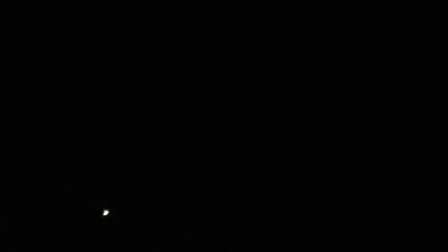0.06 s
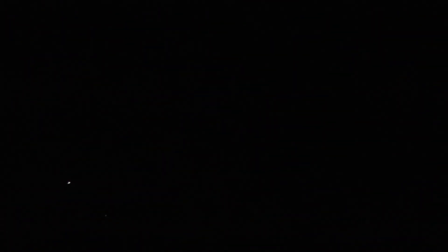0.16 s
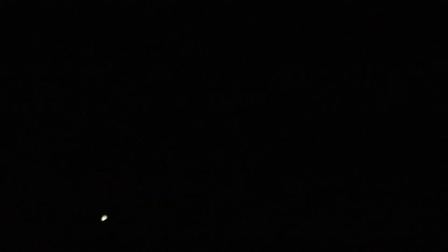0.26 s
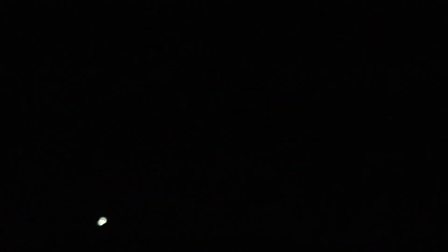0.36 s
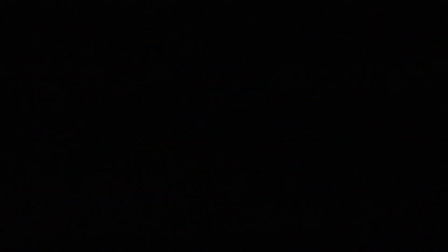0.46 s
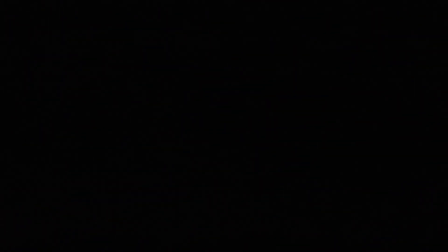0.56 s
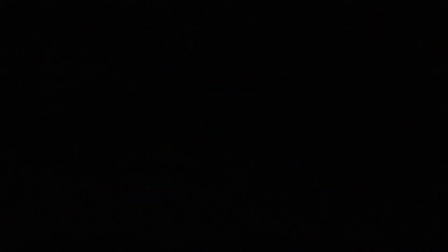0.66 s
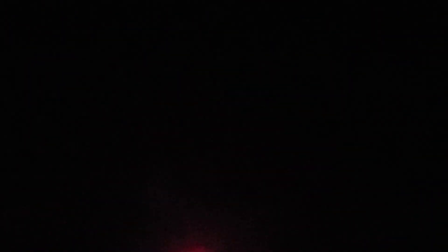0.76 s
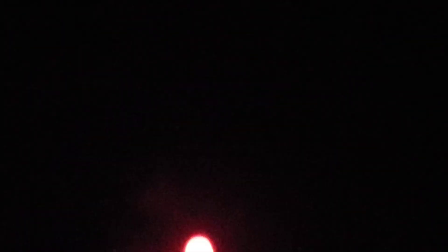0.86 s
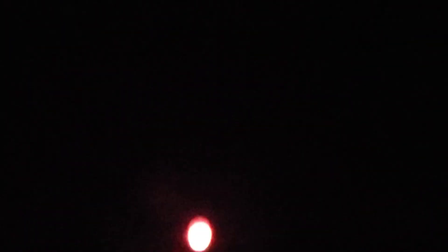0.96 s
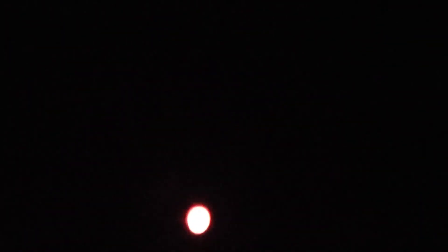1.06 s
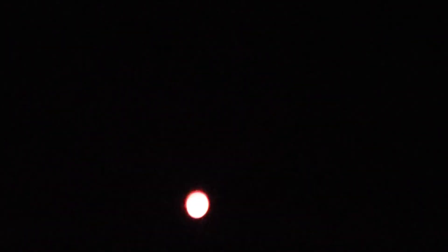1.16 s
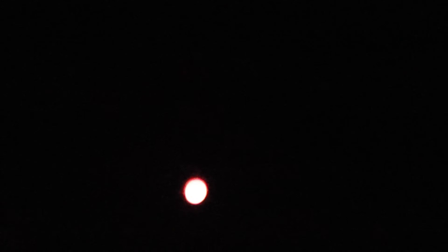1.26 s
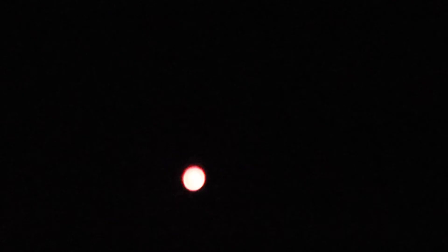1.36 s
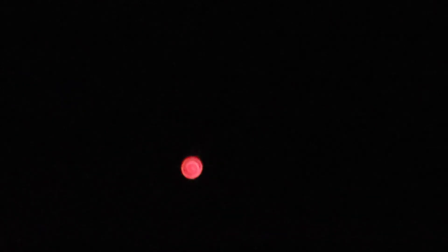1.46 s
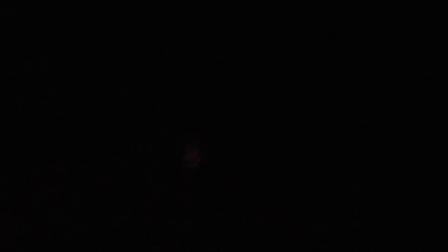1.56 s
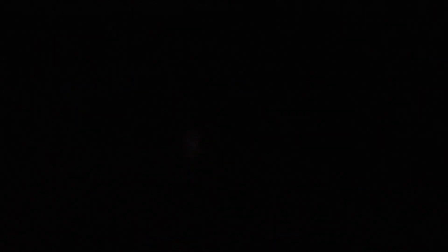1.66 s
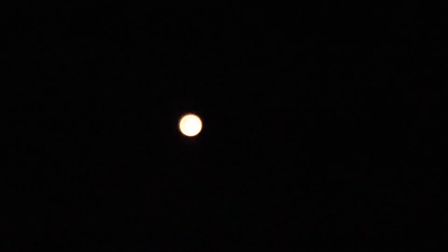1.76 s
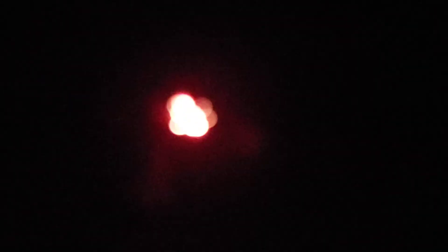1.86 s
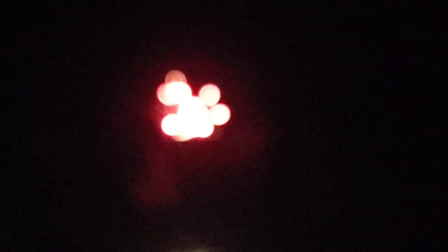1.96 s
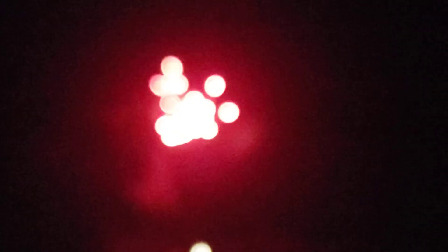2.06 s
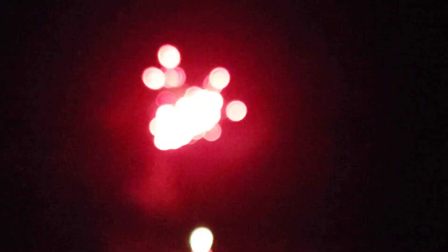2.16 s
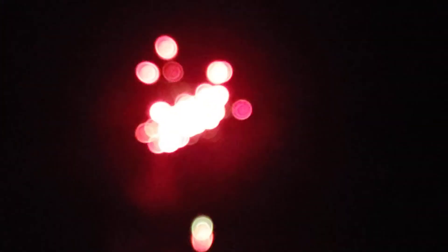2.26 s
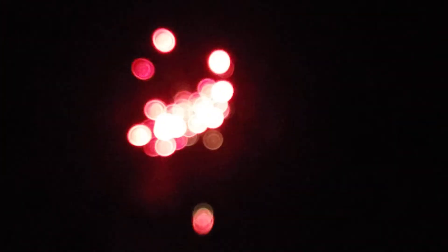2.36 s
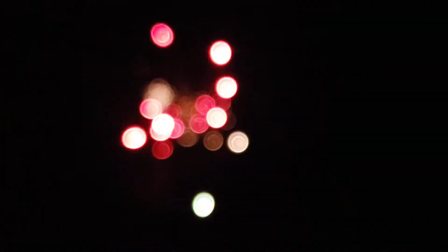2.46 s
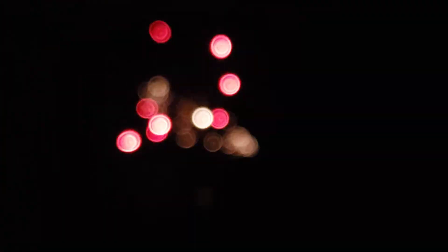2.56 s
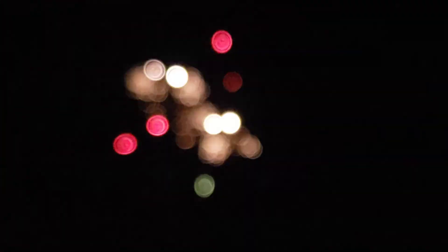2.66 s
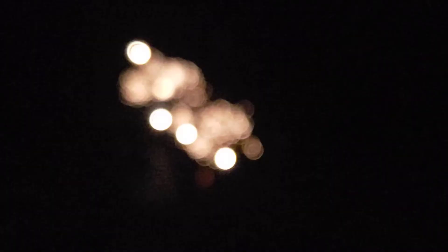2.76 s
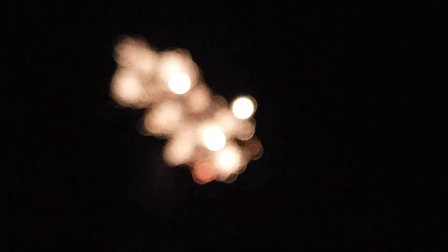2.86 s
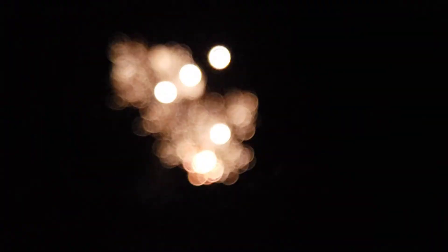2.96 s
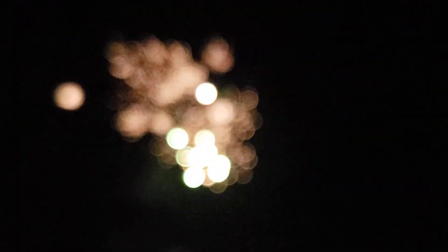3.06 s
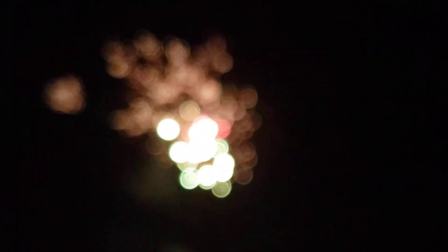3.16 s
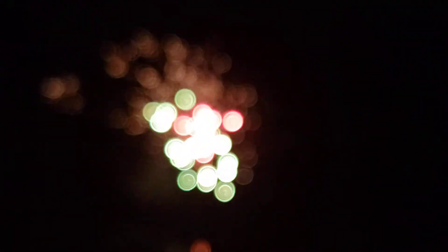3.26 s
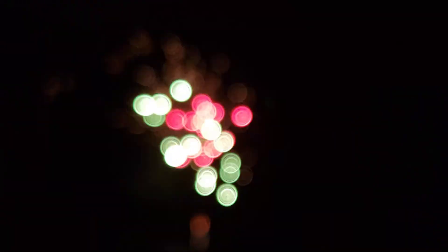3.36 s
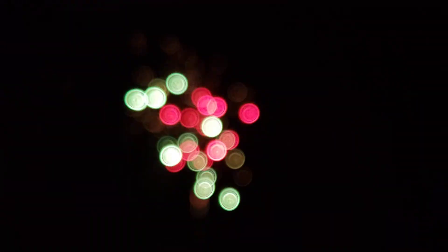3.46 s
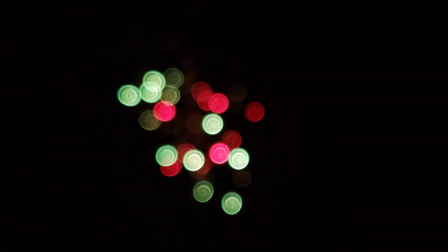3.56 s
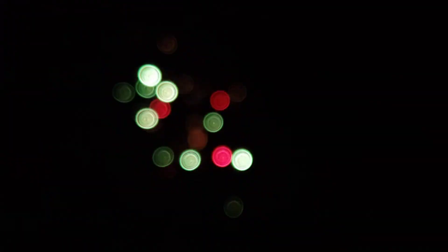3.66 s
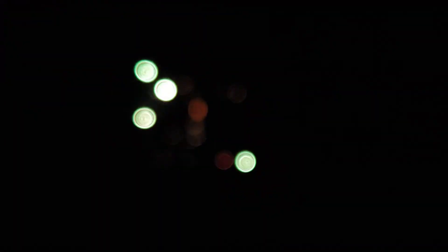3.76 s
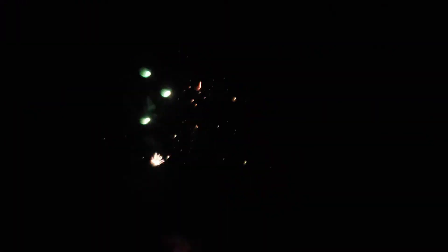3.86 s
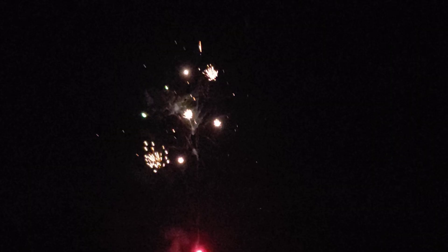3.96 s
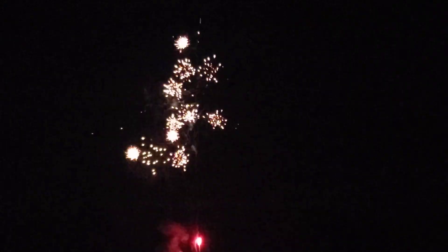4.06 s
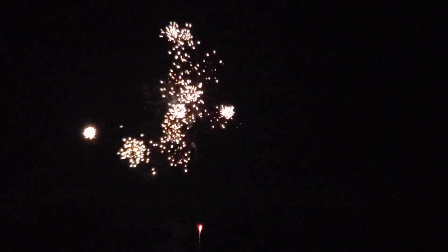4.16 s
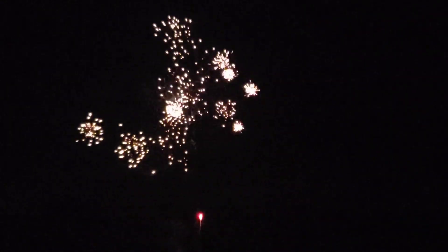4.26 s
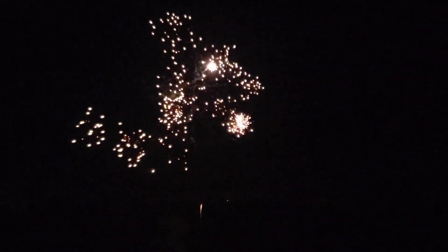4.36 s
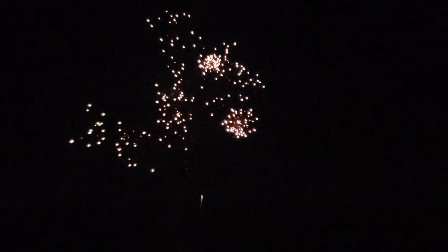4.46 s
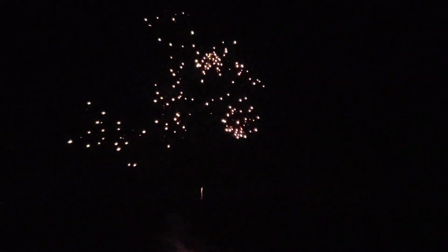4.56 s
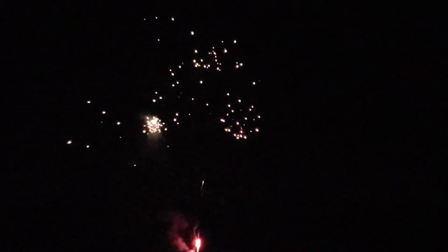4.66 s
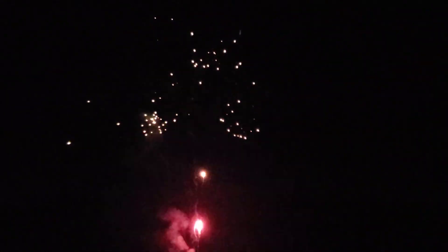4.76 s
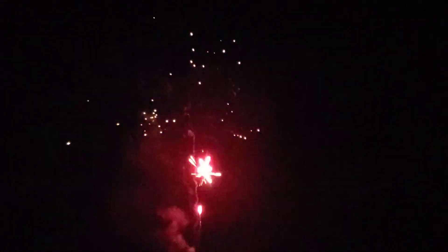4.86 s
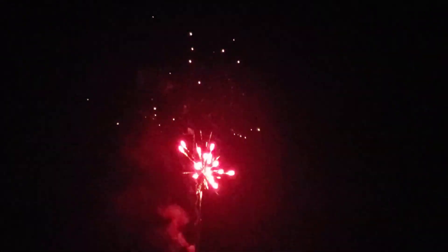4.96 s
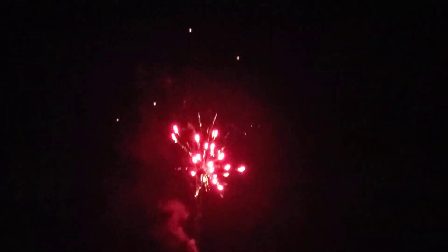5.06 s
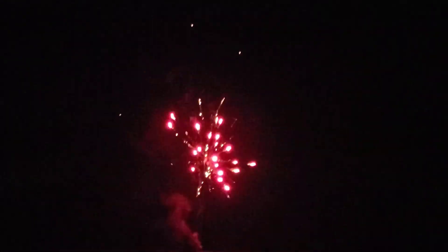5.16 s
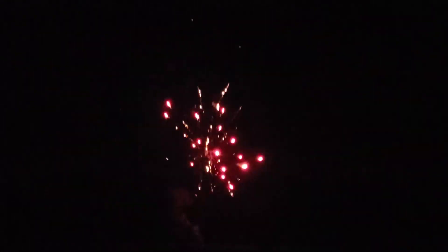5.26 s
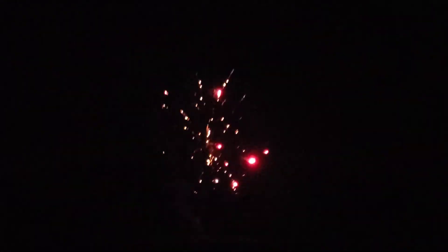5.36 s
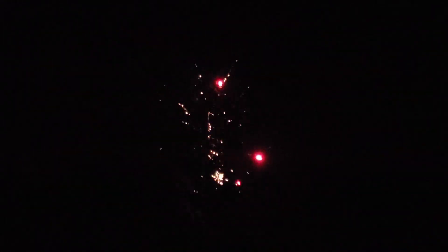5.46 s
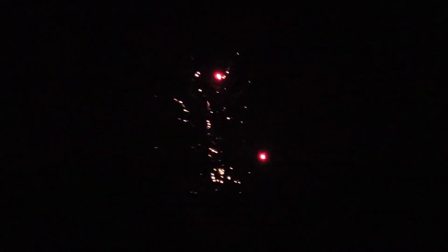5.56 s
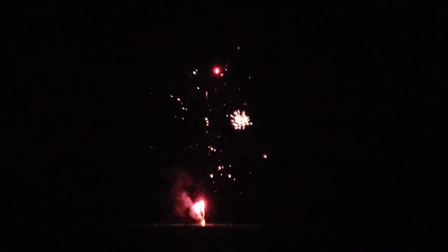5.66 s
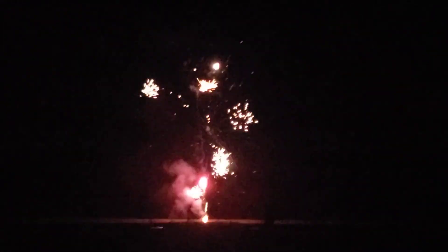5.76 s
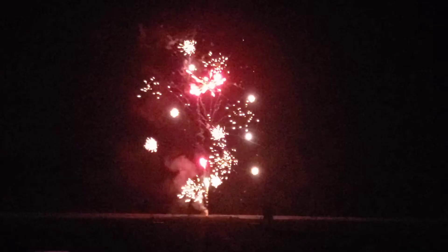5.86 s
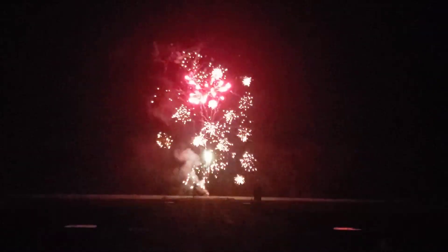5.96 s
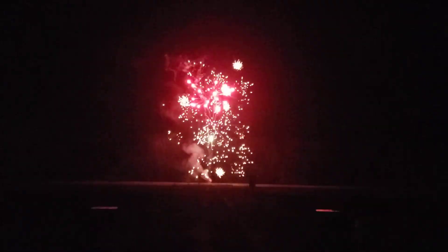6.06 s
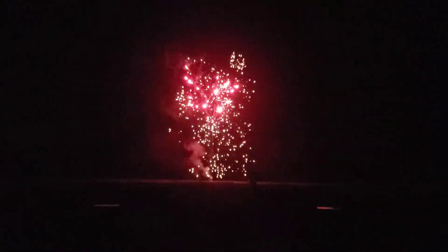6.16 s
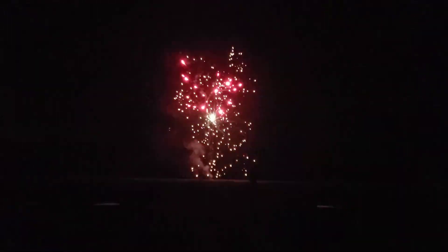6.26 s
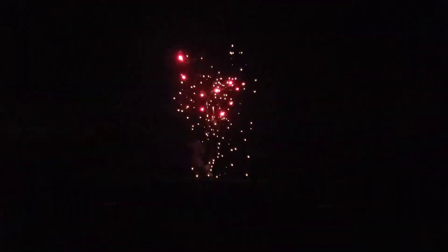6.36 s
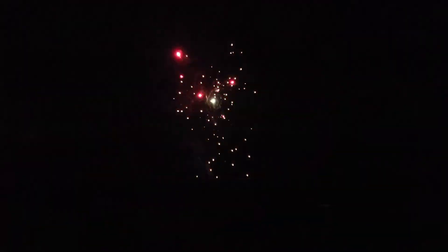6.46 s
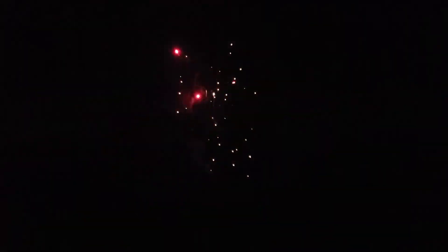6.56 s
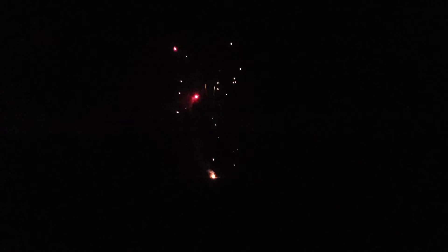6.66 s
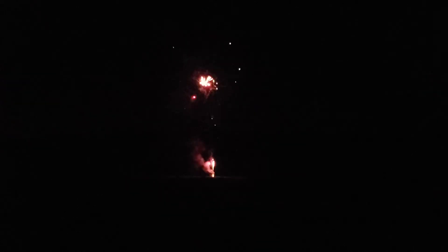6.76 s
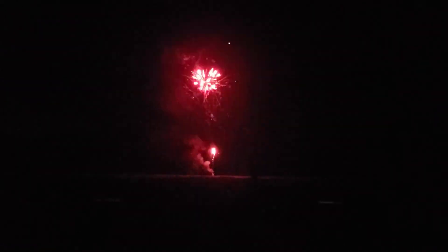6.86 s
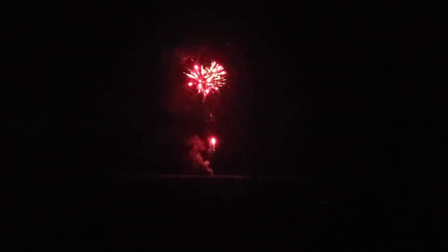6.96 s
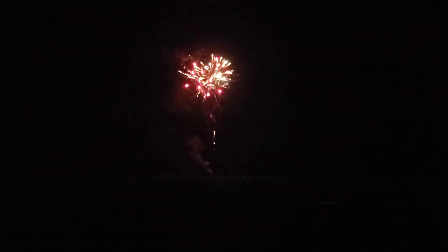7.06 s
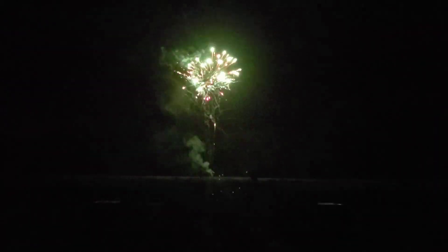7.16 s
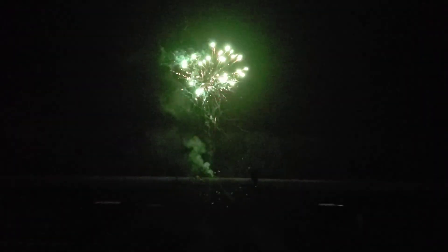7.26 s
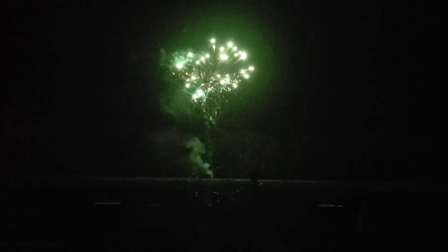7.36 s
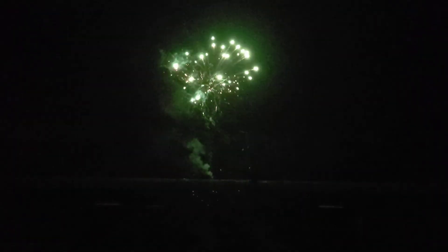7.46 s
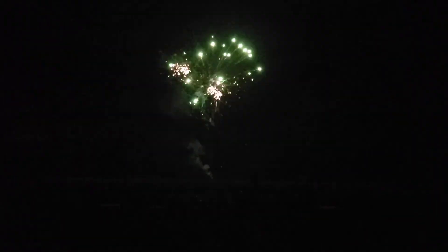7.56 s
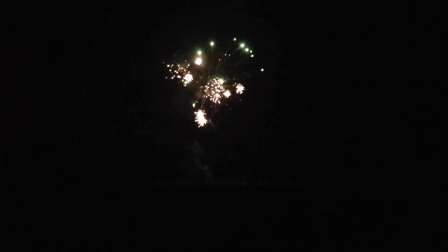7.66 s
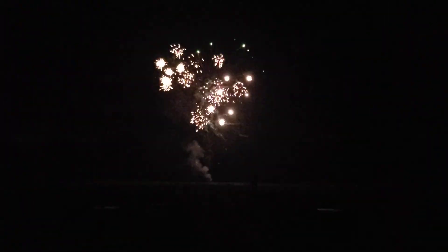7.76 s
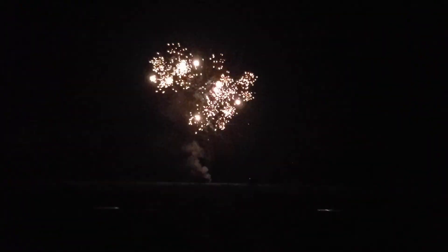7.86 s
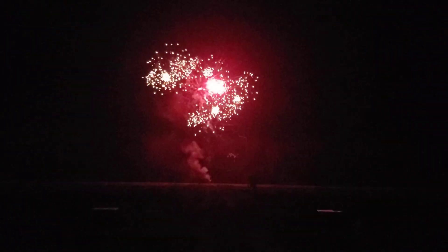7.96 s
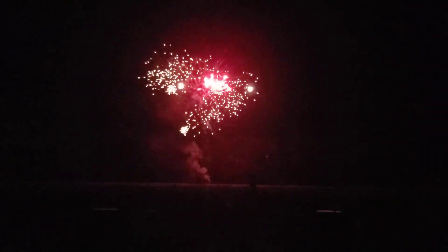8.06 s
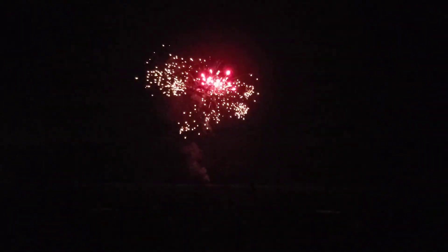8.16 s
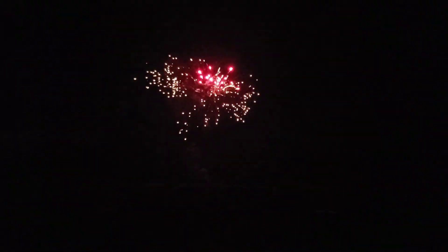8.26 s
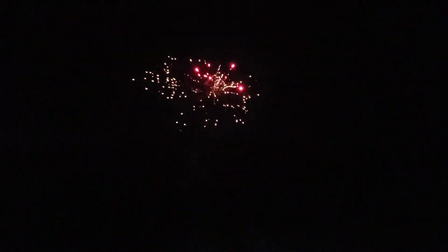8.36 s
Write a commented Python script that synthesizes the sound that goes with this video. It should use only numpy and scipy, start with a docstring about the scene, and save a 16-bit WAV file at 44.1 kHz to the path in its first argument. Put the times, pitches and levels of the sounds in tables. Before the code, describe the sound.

Over quiet night rumble and faint hiss, fireworks thump, bang hard and crackle in dense bursts, with one descending whistle and rolling tree echoes.

```python
"""A small firework display in an open field at night. Over soft night rumble and electronic hiss, echoes linger,
two faint ticks come at 0.5 and 0.8 s, and a lift charge thumps at 1.0 s. From 2.2 s shells burst as short
pulses; from 2.8 s stars crackle in swarms of tiny pulses; from 3.5 to 4.5 s a whistle of partials falls in pitch.
Reports reflect off the ground, things at hand and a wall, then come back from distant trees as shaped noise.
The right microphone is exposed and takes the swing of each burst; the left one is shaded."""
import sys
import numpy as np
from scipy import signal
from scipy.fft import rfft, irfft, next_fast_len
from scipy.io import wavfile
from scipy.ndimage import map_coordinates

SR = 44100
rng = np.random.default_rng(int(sys.argv[2]) if len(sys.argv) > 2 else 0)


def waveform_to_disk(signal):
    """Save audio, clipped to [-1, 1], as 16-bit WAV at the path in sys.argv[1]."""
    frames = np.transpose(np.atleast_2d(signal))
    scaled = np.clip(frames, -1, 1) * 32767
    samples = np.round(scaled).astype(np.int16)
    wavfile.write(sys.argv[1], SR, samples)


N = 370440
SIZE = 4096  # samples in one short sound
TIME, AGE = np.arange(N) / SR, np.arange(SIZE) / SR  # seconds into the scene, and into one short sound


def amp(db):
    """Turn dB into a gain."""
    return 10 ** (np.asarray(db) / 20)


def unit(x):
    """Scale to rms 1."""
    return x / np.sqrt(np.mean(x ** 2) + 1e-20)


def along(points, hz):
    """Read a table of (frequency, value) points on a log frequency axis."""
    f, v = np.transpose(points)
    return np.interp(np.log(hz + 1), np.log(f + 1), v)


def curves(rows, t):
    """Read each column of a table of times at the times t."""
    times, *columns = np.transpose(rows)
    return [np.interp(t, times, column) for column in columns]


def wobble(rate):
    """A smooth random curve with rate random points a second."""
    points = rng.standard_normal(int(N * rate / SR) + 4)
    return map_coordinates(points, [TIME * rate])


def filtered(x, response):
    """Shape the spectrum of x by a function of frequency."""
    size = next_fast_len(N + SR // 2)
    spectrum = rfft(x, size) * response(np.fft.rfftfreq(size, 1 / SR))
    return irfft(spectrum, size)[..., :N]


def noise(colour, apart_db):
    """Coloured stereo noise of rms 1: a shared part, plus a separate part on each side."""
    white = rng.standard_normal(N) + amp(apart_db) * rng.standard_normal((2, N))
    return unit(filtered(white, lambda hz: amp(along(colour, hz))))


def pulse(colour):
    """The sharpest pressure pulse of this colour that starts at once (minimum phase), peak 1."""
    cepstrum = irfft(np.log(amp(along(colour, np.fft.rfftfreq(SIZE, 1 / SR)))))
    # fold the spectrum's log onto positive times only
    cepstrum[1:SIZE // 2] *= 2
    cepstrum[SIZE // 2:] = 0
    p = irfft(np.exp(rfft(cepstrum)))
    return p / np.abs(p).max()


def swing(hz, life):
    """A tone whose pressure swells and dies around life seconds, peak at most 1."""
    envelope = AGE / life * np.exp(1 - AGE / life)
    return np.sin(2 * np.pi * hz * AGE) * envelope


def add(track, s, sound):
    """Mix a short sound in at time s."""
    part = track[..., round(s * SR):][..., :SIZE]
    part += sound[..., :part.shape[-1]]


# how long scatter from things nearby takes to fall 60 dB: (frequency [Hz], decay time [s])
SCATTER_DECAY = [(500, 0.085), (10000, 0.073)]


def paths(sound, ground, clutter_db, wall, scatter_db, flight=0.001088, ground_lag=0.002, wall_lag=.0177,
          apart=0.23):
    """A report arrives directly, off the ground, off things at hand and off a wall (times in s)."""
    white = rng.standard_normal((2, 1, SIZE)) + apart * rng.standard_normal((2, 2, SIZE))
    # scatter: noise in which each frequency dies at its own speed, after a soft start
    hz, t, bands = signal.stft(white[0], SR, nperseg=128)
    decay = amp(-60 * t / along(SCATTER_DECAY, hz)[:, None])
    scatter = signal.istft(bands * decay, SR, nperseg=128)[1][:, :SIZE]
    scatter *= 1 - np.exp(-(AGE / .012) ** 3)
    # clutter: a very short burst of early reflections
    clutter = white[1] * AGE ** 2 * np.exp(-AGE / 0.0008)
    way = amp(scatter_db) * scatter / np.linalg.norm(scatter[1])
    way += amp(clutter_db) * clutter / np.linalg.norm(clutter[1])
    way[:, 0] += 1  # the direct sound
    way[:, int(ground_lag * SR)] += ground
    way[:, int(wall_lag * SR)] += wall
    delayed = np.pad(sound, (int(abs(flight) * SR), 0))
    return signal.fftconvolve(delayed[None], way, axes=1)[:, :SIZE]


# shell bursts: (time [s], crack level [dB], body level [dB], boom level [dB],
# lag of the ground bounce [s], echo level [dB])
BURSTS = [(2.1915, -2.5, -2, -8.5, 0.00232, -50.5), (2.325, -3, -3, -13.5, 0.00211, -49),
          (3.248, -3.5, -9, -6, .0025, -49), (3.483, -3, -5, -26.5, 0.00192, -48.5),
          (5.23, -5.5, -3, -9, 0.00116, -45.5), (6.1551, -2, -4, -14, 0.00267, -47.5),
          (7.158, -3.5, -4.5, -7, 0.00277, -48.5), (7.3192, -2.5, -4, -6, 0.00297, -50.5),
          (8.297, -3.5, -5.5, -19, 0.0026, -54)]
# colour of the sharp snaps and, with more treble, of the shells' cracks: (frequency [Hz], relative level [dB])
SNAP_COLOUR = [(70, -17), (400, -4), (555, -11.5), (820, 1), (1560, -1.5), (3160, -9), (4400, -6.5),
               (6800, -17.5), (7900, -32.5), (12400, -34.5), (16000, -50)]
# colour of a shell's hollow body: (frequency [Hz], relative level [dB])
BODY_COLOUR = [(60, -38), (130, 2.5), (550, -2.5), (880, 6), (1120, 1.5), (1500, -5.5), (2400, -20),
               (6000, -69.5)]


def bursts():
    """Each shell gives a crack and a hollow body; its blast sucks at the exposed microphone, which swings back."""
    out = np.zeros((2, N))
    hz, db = np.transpose(SNAP_COLOUR)
    crack = pulse(np.c_[hz, db + 7 * (hz > 7500)])
    body = pulse(BODY_COLOUR)
    boom = swing(hz=63.2, life=0.0057) - 1.08 * swing(hz=216, life=0.00037)
    boom = np.pad(boom, (int(0.00074 * SR), 0))
    for s, crack_db, body_db, boom_db, lag, _ in BURSTS:
        add(out, s, paths(amp(crack_db) * crack, ground=0.068, clutter_db=-1.5, wall=0.4, scatter_db=-8.5,
                          ground_lag=lag))
        add(out, s, paths(amp(body_db) * body, ground=0.54, clutter_db=-3.5, wall=0.16, scatter_db=-8.5,
                          ground_lag=lag))
        add(out, s, amp(boom_db) * boom * amp([[-18], [0]]))  # left, right
    return out


# lift charges in the tubes: (time [s], crack level [dB], thump level [dB], echo level [dB])
LIFTS = [(1.0131, -14.5, -12.5, -56), (2.142, -16, -18, -63), (2.303, -19, -21, -79),
         (4.193, -25.5, -26.5, -86), (4.988, -22, -25.5, -63), (6.033, -22.5, -22.5, -66.5),
         (7.1134, -20, -23.5, -60.5)]
# colour of the crack at the muzzle: (frequency [Hz], relative level [dB])
LIFT_CRACK_COLOUR = [(200, -28), (900, 10.5), (1800, -4.5), (3000, -12.5), (4200, 2), (6200, -4.5),
                     (8000, -24.5), (15000, -22.5)]


def lifts():
    """A lift charge cracks at the muzzle and the tube gives one round thump."""
    out = np.zeros((2, N))
    crack = pulse(LIFT_CRACK_COLOUR)
    thump = -swing(hz=232, life=0.0014)
    for s, crack_db, thump_db, _ in LIFTS:
        add(out, s, paths(amp(crack_db) * crack, ground=0.042, clutter_db=-2.0, wall=0.061, scatter_db=-15.5))
        add(out, s, paths(amp(thump_db) * thump, ground=0, clutter_db=-22, wall=0.03, scatter_db=-14.0,
                          flight=0.00247))
    return out


# sharp snaps: faint ticks at 0.5 and 0.8 s, then crackling stars: (time [s], level [dB]), relative to each other
SNAPS = [(0.5043, -49), (0.798, -49), (2.8317, -26), (2.9021, -22.5), (3.0207, -24.5), (3.0391, -25),
         (3.0557, -20), (3.0653, -22.5), (3.0969, -19), (3.1101, -20), (3.1427, -22), (3.1559, -19.5),
         (3.1699, -15.5), (3.1856, -15), (3.2006, -16), (3.2096, -18), (3.2231, -15), (3.2292, -15.5),
         (3.2383, -17), (3.2658, -15), (3.2875, -22), (3.3094, -22), (3.3237, -22), (3.3471, -19.5),
         (3.3578, -25), (3.3761, -21), (3.4065, -22), (3.4146, -18.5), (3.423, -18), (3.469, -15.5),
         (3.5625, -19), (4.2605, -24), (4.3808, -24.5), (4.4177, -21), (4.4354, -21), (4.448, -25.5),
         (4.474, -23), (4.4864, -18.5), (4.4988, -20.5), (4.5144, -22), (4.5269, -22), (4.5541, -20),
         (4.5606, -20), (4.5915, -22.5), (4.6117, -20.5), (4.6416, -16.5), (4.7008, -18.5), (4.7164, -17),
         (4.7632, -18), (4.8231, -21), (5.1086, -20), (5.511, -36.5), (5.839, -30.5), (6.066, -21),
         (6.2163, -18), (6.2208, -24.5), (6.2484, -19.5), (6.2678, -21), (6.2725, -20), (6.2778, -18.5),
         (6.2879, -21), (6.321, -18.5), (6.331, -16.5), (6.3388, -17), (6.3565, -24.5), (6.3648, -17.5),
         (6.3725, -22), (6.3885, -22), (6.4045, -15), (6.4288, -23), (6.438, -18.5), (6.4568, -17),
         (6.4855, -17.5), (6.4959, -16.5), (6.507, -22.5), (7.9423, -25), (7.9635, -25), (7.9977, -29),
         (8.0115, -24), (8.0411, -23.5), (8.0703, -21), (8.075, -19.5), (8.0959, -21.5), (8.1308, -17.5),
         (8.166, -17), (8.171, -21.5), (8.18, -20), (8.2008, -22.5), (8.212, -22.5), (8.2174, -16.5),
         (8.228, -20), (8.2345, -16), (8.243, -28), (8.2519, -21), (8.274, -19), (8.326, -23),
         (8.3441, -19.5), (8.3689, -19.5), (8.3884, -19.5)]


def sharp_snaps(snaps):
    """Snaps sound one by one as sharp pulses, each a little brighter or duller."""
    out = np.zeros((2, N))
    hz, db = np.transpose(SNAP_COLOUR)
    for s, level_db in snaps:
        tilt = rng.normal(0, .6)  # dB per octave
        snap = pulse(np.c_[hz, db + tilt * np.log2(hz)])
        ground_lag = 0.002 * np.exp(rng.normal(0, .15))
        add(out, s, paths(amp(level_db + 5.5) * snap, ground=0.37, clutter_db=0.0, wall=0.097, scatter_db=-9.5,
                          ground_lag=ground_lag))
    return out


# strength of the whistle's flame, relative: (time [s], level [dB])
FLAME = [(3.47, -30.5), (3.6, -26.5), (3.7, -31.5), (3.85, -26.5), (3.96, -29.5), (4.05, -23.5),
         (4.2, -31.5), (4.42, -33.5), (4.49, -39.5)]
# third to sixth partial, relative: (level [dB])
OVERTONES = [-15.5, -39.5, -40.5, -46]
# richness of the whistle: (time [s], overtone level [dB])
RICHNESS = [(3.5, -4), (4.32, 0.5), (4.37, -6)]
LIT_S, FLAGS_S, SPENT_S = 3.47, 4.34, 4.49  # the whistle lights, begins to burn out, is spent
FULL_HZ, EMPTY_HZ = 2190, 1732  # first partial of the full and the empty tube; the note heard is the second
BURN_S, BURN_SHAPE, BURNOUT_HZ_PER_S = 0.41, 1.35, 498  # time and curve of the fall; rise while burning out
SPUTTERS, SPUTTER_S, SPUTTER_DB = [3.522, 3.629, 3.776], 0.014, -10  # flame falters: times, half-length, depth
SPUTTER_HZ = 55  # scale of the pitch sag into each falter and the spring back above its course


def whistle():
    """A burning tube sings lower as its fuel recedes and flutters with the flame; trees blur and prolong it."""
    fuel = np.exp(-(np.maximum(TIME - LIT_S, 0) / BURN_S) ** BURN_SHAPE)
    hz = EMPTY_HZ + (FULL_HZ - EMPTY_HZ) * fuel
    hz = hz + BURNOUT_HZ_PER_S * np.maximum(TIME - FLAGS_S, 0)
    near = np.subtract.outer(TIME, SPUTTERS) / SPUTTER_S
    falter = np.exp(-near * near)
    hz = hz + SPUTTER_HZ * sum((near * falter).T)
    flame_db = curves(FLAME, TIME)[0] + SPUTTER_DB * sum(falter.T)
    gate = np.clip(np.minimum(TIME - LIT_S, SPENT_S - TIME) / 0.0025, 0, 1)
    flame = gate * amp(flame_db + 2.0)

    jitter = .004 * wobble(600) + .004 * wobble(90) + .004 * wobble(28)
    flutter_db = 1.1 * wobble(300) + 1.7 * wobble(35)
    phase = 2 * np.pi * np.cumsum(hz * (1 + jitter)) / SR
    partials = [amp(level + 3 * wobble(45)) * np.sin(k * phase) for k, level in enumerate(OVERTONES, 3)]
    overtones = amp(curves(RICHNESS, TIME)[0]) * sum(partials)
    tone = flame * amp(flutter_db) * (np.sin(2 * phase) + overtones)

    trees = rng.standard_normal((2, 2 * SR)) * amp(edge_treble(TIME[:2 * SR]))
    blurred = flame * np.sin(2 * phase + 1.3 * wobble(250))
    tail = signal.fftconvolve(blurred[None], trees / np.linalg.norm(trees[0]), axes=1)[:, :N]
    return tone + amp(-20.5) * tail


# colours of the rustle, the hollow roll and the low rumble: (frequency [Hz], relative level [dB])
RUSTLE_COLOUR = [(300, -4.5), (1200, 4), (4300, -1.5), (6500, -9.5), (8000, -28.5)]
ROLL_COLOUR = [(100, -38), (260, -13), (420, -3.5), (550, -8.5), (750, -1), (1050, -1), (1400, -9.5),
               (2000, -27), (3200, -59)]
RUMBLE_COLOUR = [(30, -4.5), (90, 9.5), (380, 3), (560, -20), (2600, -75)]
# reports before the start, whose echoes still die away: (time [s], echo level [dB])
EARLIER_LIFT, EARLIER_SHELL = (-1.08, -58), (-1.68, -45)
TREBLE_HZ = 2480  # above this the rustle fades faster


def echoes(snaps):
    """Countless trunks and twigs return the reports as a rustle, a hollow roll and a low rumble."""
    shells = [(s, db) for s, *_, db in [EARLIER_SHELL, *BURSTS]]
    tubes = [(s, db) for s, *_, db in [EARLIER_LIFT, *LIFTS]]

    def together(shape, shell_db, tube_db, snap_db):
        """Add the powers of the echoes of all three kinds of report."""
        kinds = [(shell_db, shells), (tube_db, tubes), (snap_db, snaps)]
        parts = [amp(db) * answer(reports, shape) for db, reports in kinds]
        return np.linalg.norm(parts, axis=0)

    grain_db = 1.5 * wobble(110) + 2 * wobble(900)
    twigs = unit(amp(grain_db) * noise(RUSTLE_COLOUR, apart_db=10.0))
    dull = filtered(twigs, lambda hz: 1 / (1 + (hz / TREBLE_HZ) ** 4))
    treble = twigs - dull
    rustle = together(edge, shell_db=-2.0, tube_db=1.5, snap_db=-46.5) * dull
    rustle = rustle + together(edge_treble, shell_db=-0.5, tube_db=5.0, snap_db=-47.0) * treble
    roll = together(depth, shell_db=2, tube_db=-2.5, snap_db=-55.0) * noise(ROLL_COLOUR, apart_db=4)
    rumble = answer(tubes, depth) * noise(RUMBLE_COLOUR, apart_db=-29)
    return rustle + roll + rumble


def answer(reports, shape):
    """Level of the overlapping echoes of (time, level) reports: their powers add."""
    t = TIME[::64]
    power = sum((t > s) * amp(db + shape(t - s)) ** 2 for s, db in reports)
    return np.interp(TIME, t, np.sqrt(power))


TREES_S = 0.33  # round trip of a report to the tree line
SWELL_S, SWELL_DB = 0.29, 2.5  # the rustle grows as trees further back join in
AIR_LOSS_DB_PER_S = 23.5  # extra fading of the treble, which has crossed more air


def treeline(t, field_db, field_db_per_s, rise_s, hold_s, fade_db_per_s):
    """Echo level in dB, t after a report: the open field answers first, then the trees take over, hold and fade."""
    arrived = np.clip((t - TREES_S) / rise_s, 0, 1)
    field = field_db + field_db_per_s * np.clip(t, 0, TREES_S)
    return (1 - arrived) * field - fade_db_per_s * np.maximum(t - TREES_S - hold_s, 0)


def edge(t):
    """The first trees answer abruptly; the answer swells as more join in, then fades (dB)."""
    swell = SWELL_DB * np.clip((t - TREES_S) / SWELL_S, 0, 1)
    return swell + treeline(t, field_db=-2.5, field_db_per_s=-48, rise_s=0.0057, hold_s=0.19, fade_db_per_s=16)


def edge_treble(t):
    """The same answer in the treble, thinned by the air on ever longer paths (dB)."""
    grass_db = -5 * (t < TREES_S)  # the grass returns little treble
    return edge(t) + grass_db - AIR_LOSS_DB_PER_S * np.maximum(t - TREES_S, 0)


def depth(t):
    """The depth of the wood answers gradually and lingers (dB)."""
    return 4.5 + treeline(t, field_db=-21.0, field_db_per_s=23, rise_s=0.13, hold_s=0.31, fade_db_per_s=15.5)


# background: (time [s], night air level [dB], electronic hiss level [dB])
FLOOR = [(0.6, -55.5, -65), (1.7, -50.5, -56.5), (2.15, -55, -56.5), (2.4, -57.5, -62)]
# colours of the night air and of the hiss: (frequency [Hz], relative level [dB])
AIR_COLOUR = [(25, -30), (55, 1), (140, -8), (410, -2), (1200, -20), (3400, -53), (4150, -25), (4900, -47),
              (8000, -67)]
HISS_COLOUR = [(5000, -71), (8500, -1.5), (10500, 16), (12350, 19), (13700, 12), (14400, 7), (16000, 23)]


def background():
    """Distant night rumble as drifting low noise, and the fine hiss and buzz of electronics."""
    air_db, hiss_db = curves(FLOOR, TIME)
    hiss = noise(HISS_COLOUR, apart_db=6) + chirps()
    drift_db = 1.5 * wobble(5)
    return amp(air_db + drift_db) * noise(AIR_COLOUR, apart_db=-12.5) + amp(hiss_db) * hiss


def chirps():
    """The electronics tick twice a cycle, each tick a tiny falling chirp; together they buzz."""
    rate_hz, second_s, scatter_s = 62.85, .0062, .00012  # cycles, delay of the second tick, unevenness
    rest_hz, sweep_hz, life_s = 12200, 5500, .0008  # final pitch, fall in pitch, its time scale
    ticks = np.zeros(N + SR)
    starts = np.arange(1 / rate_hz, N / SR, 1 / rate_hz)
    at = (rng.normal(np.r_[starts, starts + second_s], scatter_s) * SR).astype(int)
    ticks[at] = amp(rng.normal(0, 1, len(at)))
    phase = 2 * np.pi * np.cumsum(rest_hz + sweep_hz * np.exp(-AGE / life_s)) / SR
    chirp = np.sin(phase) * AGE * np.exp(-AGE / life_s)
    return unit(signal.fftconvolve(ticks, chirp)[:N])


# shading of the left microphone: (frequency [Hz], left minus right level [dB])
SHADE = [(60, 1), (700, -4.5), (1290, 0.5), (2380, -11), (4400, -23), (8000, -16), (15000, -17)]


def microphones(field, lag):
    """Sound reaches the shaded left microphone coloured, mostly duller, and lag seconds later."""
    def ports(hz):
        """Responses of left and right, balanced so that their gains average 1."""
        shade = amp(along(SHADE, hz))
        left = shade * np.exp(-2j * np.pi * hz * lag)
        return 2 * np.array([left, np.ones_like(hz)]) / (1 + shade)
    return filtered(field, ports)


def scene():
    """The display stands a little to the right; the trees answer from further round that side."""
    display = bursts() + lifts() + whistle() + sharp_snaps(SNAPS)
    return microphones(display + background(), lag=0.0002) + microphones(echoes(SNAPS), lag=0.00039)


TOP_HZ = 16000  # band limit


def record(dry):
    """The loudest peaks are rounded off, and nothing is kept from the band limit up."""
    rounded = dry / (1 + np.abs(dry) ** 6) ** (1 / 6)
    return filtered(rounded, lambda hz: hz < TOP_HZ)


dry = scene()
out = record(dry)
waveform_to_disk(out)
```